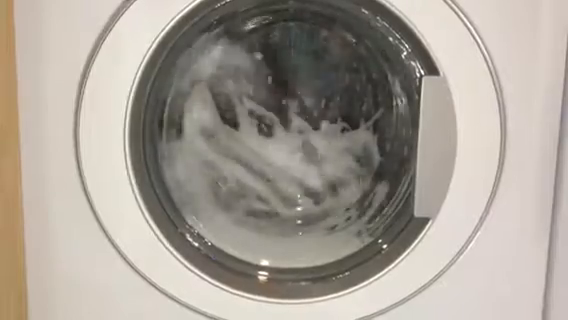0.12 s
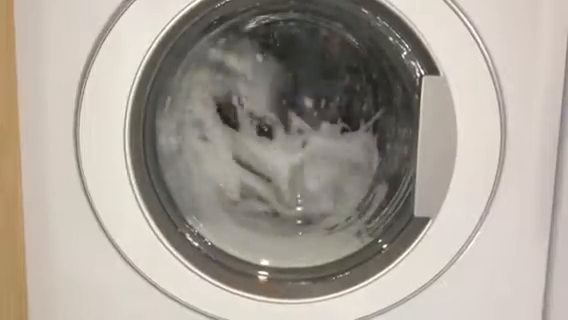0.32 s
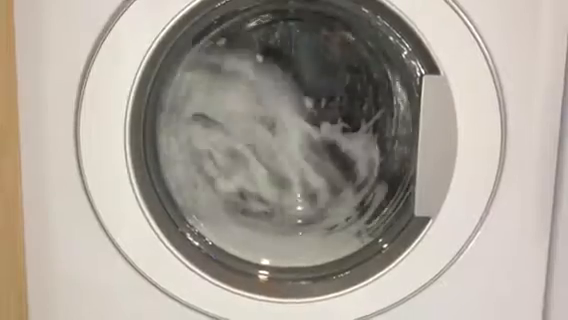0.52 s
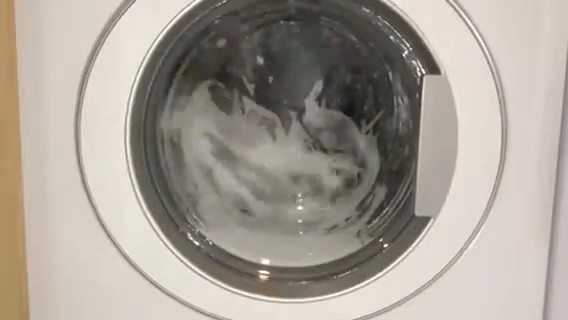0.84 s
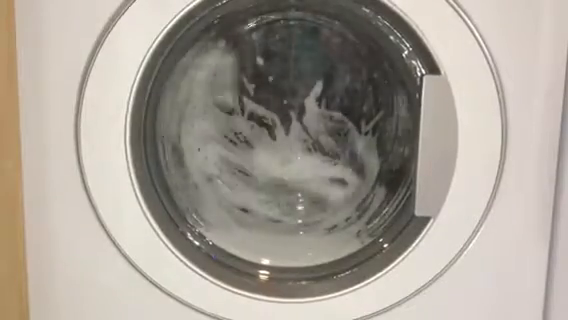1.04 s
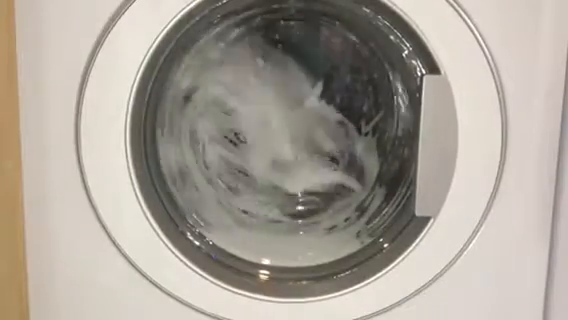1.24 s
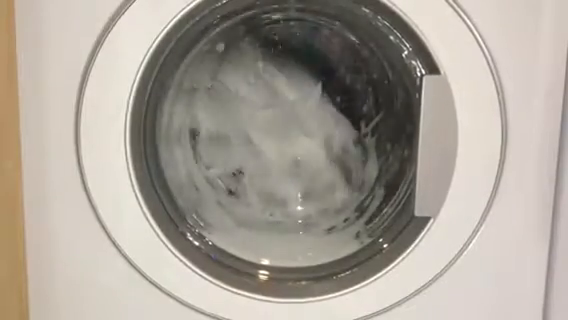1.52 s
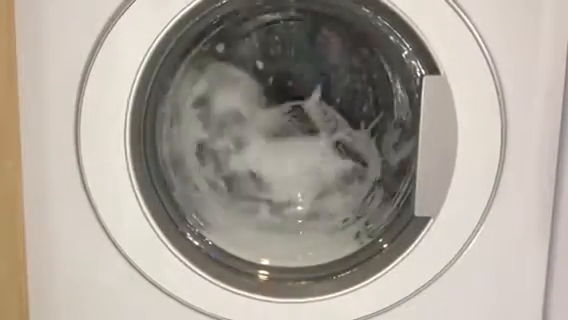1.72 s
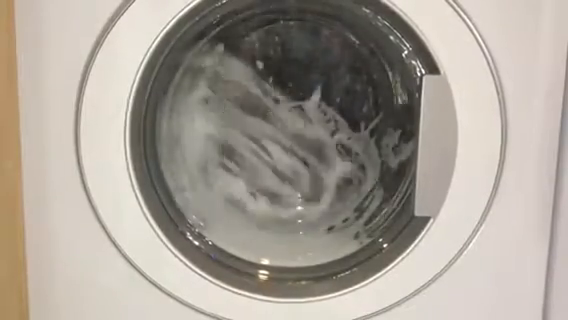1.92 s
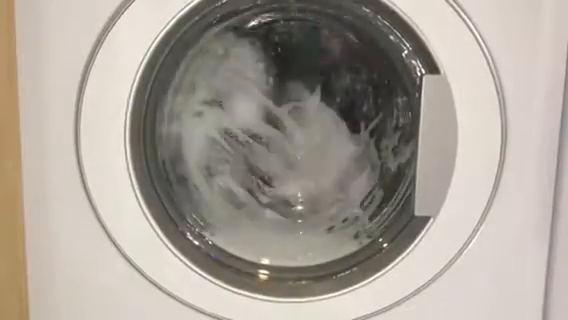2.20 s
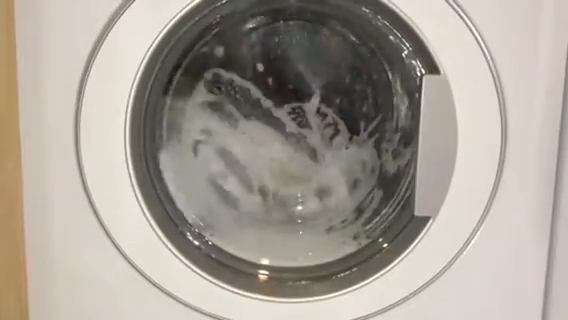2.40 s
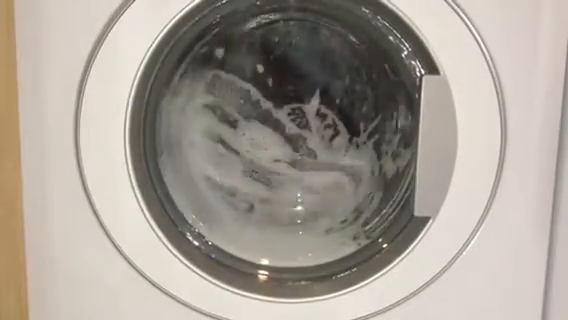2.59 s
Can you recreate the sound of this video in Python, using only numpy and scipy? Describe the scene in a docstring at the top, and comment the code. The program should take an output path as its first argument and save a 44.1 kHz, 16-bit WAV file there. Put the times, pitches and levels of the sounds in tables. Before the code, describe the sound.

Close indoor sound of a washer drum turning soaked laundry: paired clattering knocks with heavy thuds in the first half second, quieter watery churning and dull flops, a crisp rattling knock late, faint steady motor rumble.

```python
"""A small room with a front-loading washing machine turning a heavy wet load, heard at one microphone.
Hard knocks crack, rattle the cabinet as dense noise and ring the drum and door as damped sines.
Wet cloth thuds as low damped sines and slaps the glass once as a noise burst.
Bubble tones and noise slosh, drops ring, and suds spit over the noise rumble and hum of the drive.
Direct sound outweighs the room's tail."""
import sys
import numpy as np
from scipy import signal
from scipy.fft import rfft, irfft, next_fast_len
from scipy.io import wavfile

SR = 44100
rng = np.random.default_rng(int(sys.argv[2]) if len(sys.argv) > 2 else 0)


def dump_mix(stems):
    """Bounce the given channels to the path in sys.argv[1] as a 16-bit WAV at rate SR."""
    frames = np.atleast_2d(stems).T  # one column per channel
    limited = np.clip(frames, -1, 1)  # hard clip at full scale
    pcm = np.round(limited * 32767).astype(np.int16)
    wavfile.write(sys.argv[1], SR, pcm)


N = 121275
T = np.arange(N) / SR

# hard parts of the load on drum and door: start_s, ring_db, pitch_hz (most excited), clatter_db, crack_db
KNOCKS = [(0.195, -47.5, 1390, -59, -80), (0.2341, -29, 1220, -35, -46), (0.2399, -23.5, 890, -34, -57.5),
          (.267, -38, 900, -40.5, -54.5), (0.4445, -29.5, 904, -32, -60), (.4525, -22, 625, -38.5, -60),
          (.511, -38, 786, -44, -63), (2.3524, -36.5, 1500, -35.5, -41.5), (2.3565, -26, 863, -37.5, -52),
          (2.3755, -27.5, 680, -36.5, -55), (2.3873, -26, 556, -52.5, -61), (2.417, -34.5, 600, -48.5, -68)]
# drum and door modes: pitch_hz, level_db, t60_s
DRUM_MODES = [(363, -7, 0.43), (443, -5.5, 0.26), (566, -16, 0.16), (599.8, -9, 0.11), (608.4, -2.5, 0.21),
              (683, -6, 0.52), (786.5, -2.5, 0.087), (824, -3, 0.087), (948, -0.5, 0.13),
              (987, -10.5, 0.16), (1103, -18.5, 0.63), (1293, -9.5, 0.54), (1453, -12.5, 0.6),
              (1580, -19.5, 0.2), (2284, -24.5, 0.17), (2563, -27.5, 0.29)]
# dense ringing of the cabinet: frequency_hz, relative_level_db
CLATTER_SPECTRUM = [(20, -45), (50, -28), (100, -13.5), (170, 4.5), (260, -1), (340, -0.5), (600, 4),
                    (1000, -1.5), (1300, -9.5), (1800, -19.5), (2400, -30), (3000, -39), (6000, -51.5),
                    (15000, -62)]
# first snap of a contact: frequency_hz, relative_level_db
CRACK_SPECTRUM = [(30, -54), (150, -7.5), (700, 8.5), (1500, 6.5), (2400, 6), (3100, -11.5), (5000, -22.5),
                  (7000, -35.5), (15000, -39)]
CONTACT_S = 0.0018  # rise of a hard contact
BLOW_DB, BLOW_DECAY_S = 16, 0.0058  # level and decay of the extra ring at the start of a blow
RING_FOCUS_DB, CLATTER_FOCUS_DB = 9, 2.5  # lift at the most excited pitch
CLATTER_DECAY_S, CLATTER_TAIL_DB = 0.018, -4.5
CRACK_RISE_S, CRACK_DECAY_S, CRACK_TAIL_DB = 0.003, 0.0058, -7
BEAT_DEPTH = 0.38
RING_WET_DB = -11.5


def knocks():
    """Each blow cracks, shakes the cabinet and rings the drum modes near its own pitch."""
    ring, rattle = np.zeros(N), np.zeros(N)
    t = T[:SR // 2]
    mode_hz, mode_db, t60 = np.transpose(DRUM_MODES)
    modes = np.sin(2 * np.pi * mode_hz[:, None] * t) * fade_60db(t, t60[:, None])
    blow = np.minimum(t / CONTACT_S, 1) * (1 + amp(BLOW_DB) * np.exp(-t / BLOW_DECAY_S))
    grid_hz = np.geomspace(20, 16000, 100)
    for start, ring_db, pitch_hz, clatter_db, crack_db in KNOCKS:
        share = amp(mode_db + RING_FOCUS_DB * focus(mode_hz, pitch_hz))
        share = share / share.sum()
        # close pairs of modes beat as they ring, each at its own random rate
        beat_hz = rng.uniform(-13.2, 12, (len(mode_hz), 1))
        beats = 1 + BEAT_DEPTH * np.sin(2 * np.pi * beat_hz * t)
        add(ring, start, amp(ring_db) * blow * (share @ (modes * beats)))

        panel_db = read(CLATTER_SPECTRUM, grid_hz) + CLATTER_FOCUS_DB * focus(grid_hz, pitch_hz)
        panels = colour(taps(SR), np.column_stack([grid_hz, panel_db]))
        clatter = burst(panels, CONTACT_S, CLATTER_DECAY_S, CLATTER_TAIL_DB)
        add(rattle, start, amp(clatter_db) * clatter)

        snap = colour(taps(SR), CRACK_SPECTRUM)
        crack = burst(snap, CRACK_RISE_S, CRACK_DECAY_S, CRACK_TAIL_DB)
        add(rattle, start, amp(crack_db) * crack)
    return room(ring, RING_WET_DB) + rattle


def focus(hz, pitch_hz):
    """How near a frequency lies to the pitch that a blow excites most, 0-1."""
    width_octaves = 0.44
    return np.exp(-(np.log2(hz / pitch_hz) / width_octaves) ** 2)


# dull thuds of wet cloth: start_s, level_db, pitch_hz, t60_s
THUDS = [(.236, -31.5, 200.6, 0.21), (.262, -31.5, 166.3, 0.12), (.305, -43, 292.6, 0.24),
         (.444, -26.5, 209.3, 0.091), (.449, -20.5, 261, 0.094), (.468, -33, 355, 0.16),
         (.972, -49, 222, 0.1), (1.064, -45, 274, 0.19), (1.115, -51.5, 171, 0.28),
         (1.4555, -37, 266, 0.083), (1.459, -34, 164.5, 0.15), (1.682, -48.5, 200.5, 0.35),
         (1.72, -40, 251.4, 0.18), (2.06, -34.5, 165.3, 0.14), (2.066, -40, 245, 0.19),
         (2.092, -44, 133.7, 0.18), (2.104, -41, 299.6, 0.11), (2.364, -34, 278.2, 0.25),
         (2.728, -43.5, 227, 0.23)]
THUD_RISE_S, THUD_WET_DB = 0.003, -11


def thuds():
    """Wet cloth lands dully: each thud is a low damped resonance in the room."""
    return room(pings(THUDS, THUD_RISE_S), THUD_WET_DB)


# wet cloth on the door glass: frequency_hz, relative_level_db
SLAP_SPECTRUM = [(30, -40), (150, -16), (500, 5.5), (950, 0.5), (1200, -2.5), (1500, -1.5), (2500, -14.5),
                 (3200, -20), (5500, -31), (6300, -44), (15000, -54)]
SLAP_START_S, SLAP_DB = 2.0565, -39.5
SLAP_RISE_S, SLAP_DECAY_S, SLAP_TAIL_DB = 0.0012, 0.0054, -7.5


def slap():
    """A wet fold smacks flat against the door glass, a short burst of dense noise."""
    out = np.zeros(N)
    smack = burst(colour(taps(SR), SLAP_SPECTRUM), SLAP_RISE_S, SLAP_DECAY_S, SLAP_TAIL_DB)
    add(out, SLAP_START_S, amp(SLAP_DB) * smack)
    return out


# falls of water: start_s, churn_db, rise_s, decay_s, splash_db
SLOSHES = [(0.023, -55, 0.0084, 0.029, -76), (0.108, -55, 0.0062, 0.11, -81.5),
           (0.221, -38, 0.019, .02, -51), (.328, -47, .004, 0.015, -62.5), (.41, -51, 0.021, 0.072, -61),
           (0.612, -48.5, .005, 0.049, -74), (0.801, -55.5, 0.0053, 0.08, -72),
           (0.917, -78, 0.0045, 0.024, -77), (.952, -50, 0.023, 0.065, -71),
           (1.053, -56, 0.0088, 0.023, -68), (1.187, -78, 0.0063, 0.043, -78),
           (1.321, -66, 0.0089, 0.034, -72), (1.445, -57.5, 0.0061, 0.024, -89),
           (1.518, -50.5, .012, 0.025, -73), (1.626, -84, .008, 0.015, -67), (1.669, -55, 0.0047, 0.1, -72),
           (1.706, -51.5, 0.01, 0.055, -82), (2.008, -61, 0.0035, 0.021, -75),
           (2.192, -53.5, 0.02, 0.077, -79), (2.64, -56.5, .005, 0.09, -80.5),
           (2.722, -52, 0.007, 0.064, -93)]
# churning water: frequency_hz, relative_level_db
CHURN_SPECTRUM = [(25, -26), (70, -12), (105, 4.5), (170, 6), (250, 5.5), (340, -4.5), (600, -2.5),
                  (900, -10.5), (1400, -21.5), (2200, -41.5), (3200, -62), (15000, -60.5)]
# its splashing: frequency_hz, relative_level_db
SPLASH_SPECTRUM = [(300, -9.5), (1000, 4.5), (2100, 8.5), (2800, -3.5), (3300, -8.5), (5000, -12.5),
                   (7500, -25), (15000, -21)]
WATER_WET_DB = -5


def sloshes():
    """Water churns and splashes each time a fold of the load falls, as swells of bubbling noise."""
    churn, splash = np.zeros(N), np.zeros(N)
    for start, churn_db, rise, decay, splash_db in SLOSHES:
        envelope = swell(start, rise, decay)
        churn += amp(churn_db) * envelope
        splash += amp(splash_db) * envelope
    return churn * colour(bubbles(), CHURN_SPECTRUM) + splash * colour(bubbles(), SPLASH_SPECTRUM)


BUBBLES_PER_S, BUBBLE_SPREAD_DB = 1500, 6  # mean rate over all pitches, range of random gain
BUBBLE_SHARE = 0.55  # share of the power in bubbles, the rest is spray
BUBBLE_CYCLES = 6.1  # cycles in one unit of a bubble's envelope time


def bubbles(count=40):
    """A froth of short rising bubble tones in fine spray."""
    froth = np.zeros(N)
    for hz in np.geomspace(200, 6000, count):
        u = np.arange(0, 5, hz / BUBBLE_CYCLES / SR)  # envelope time, shorter for higher bubbles
        tone = u * np.exp(-2 * u) * np.sin(2 * np.pi * BUBBLE_CYCLES * u * (1 + 0.02 * u))
        struck = rng.random(N) < BUBBLES_PER_S / count / SR
        pops = struck * amp(BUBBLE_SPREAD_DB * rng.random(N))
        froth += np.sqrt(hz) * unit(signal.oaconvolve(pops, tone)[:N])
    spray = rng.standard_normal(N)
    return np.sqrt(BUBBLE_SHARE) * unit(room(froth, WATER_WET_DB)) + np.sqrt(1 - BUBBLE_SHARE) * spray


# single drops: start_s, level_db, pitch_hz, t60_s
DROPS = [(1.062, -68.5, 2100, 0.054), (1.2, -71.5, 1500, .05), (1.371, -61.5, 1514, 0.087)]


def drops():
    """Each single drop is a high damped resonance in the room."""
    return room(pings(DROPS, CONTACT_S), WATER_WET_DB)


# spitting suds: start_s, level_db, rise_s, decay_s
SPITS = [(0.023, -72, .004, 0.022), (.532, -69, .004, 0.017), (0.555, -71.5, .006, 0.024),
         (0.804, -74.5, 0.0018, 0.018), (.834, -77, 0.0033, 0.026), (1.18, -75.5, 0.014, 0.036),
         (1.671, -72, 0.0014, 0.0045), (1.907, -65, .012, 0.035), (2.045, -70.5, .003, 0.025),
         (2.19, -71.5, 0.0044, 0.011), (2.326, -69.5, 0.0044, 0.024), (2.49, -72.5, 0.0039, .012)]
# their fizz: frequency_hz, relative_level_db
SPIT_SPECTRUM = [(800, -5), (2400, 10), (3600, -4.5), (9500, -9), (13500, -5.5), (16000, -1)]


def spits():
    """Brief fizzes of suds, swells of bright noise."""
    envelope = sum(amp(db) * swell(start, rise, decay) for start, db, rise, decay in SPITS)
    return envelope * colour(rng.standard_normal(N), SPIT_SPECTRUM)


# thin run of water: frequency_hz, relative_level_db
TRICKLE_SPECTRUM = [(2000, -12), (4200, -1), (5000, 8), (5900, -5), (9000, -34)]
TRICKLE_CENTRE_S, TRICKLE_HALF_S, TRICKLE_DB = 1.3, 0.054, -87


def trickle():
    """A thin, high run of water, noise that swells and fades once."""
    envelope = np.exp(-((T - TRICKLE_CENTRE_S) / TRICKLE_HALF_S) ** 2)
    return amp(TRICKLE_DB) * envelope * colour(rng.standard_normal(N), TRICKLE_SPECTRUM)


# drive and tub: frequency_hz, relative_level_db
RUMBLE_SPECTRUM = [(20, -43.5), (40, -14), (72, -15.5), (105, 0.5), (170, 0), (250, 1.5), (330, -8.5),
                   (600, -8.5), (900, -16.5), (1400, -28), (2200, -33.5), (3100, -42), (6500, -47),
                   (9100, -46.5), (10500, -48), (13000, -49.5), (16000, -52)]
# drive tone: pitch_hz, level_db
HUM = [(249, -68)]
# the tub booms as the load shifts: centre_s, level_db, half_length_s
BOOMS = [(.31, -57.5, 0.075), (.53, -64.5, 0.099), (0.667, -60, 0.081), (1.021, -58, 0.13),
         (1.516, -60, 0.04), (1.72, -61, 0.11), (2.108, -56, 0.026), (2.441, -62, 0.15)]
RUMBLE_DB, RUMBLE_WANDER_DB = -58, 2.55
HUM_WANDER_HZ, BOOM_HZ, BOOM_WANDER_HZ = 11, 73.4, 7  # wanders are rms


def drive():
    """Restless rumble of the turning tub, its low booms and the motor's faint hum."""
    noise = colour(rng.standard_normal(N), RUMBLE_SPECTRUM)
    low = signal.sosfilt(signal.butter(2, 2500, "low", fs=SR, output="sos"), noise)
    noise = colour(rng.standard_normal(N), RUMBLE_SPECTRUM)
    high = signal.sosfilt(signal.butter(2, 2500, "high", fs=SR, output="sos"), noise)
    # only the low part wavers in level
    rumble = amp(RUMBLE_DB) * (low * amp(RUMBLE_WANDER_DB * wander(19)) + high)

    hum = np.zeros(N)
    for hz, db in HUM:
        tone = np.sin(2 * np.pi * np.cumsum(hz + HUM_WANDER_HZ * wander(11.6)) / SR)
        hum += amp(db) * unit(tone * (1 + 0.5 * wander(3.3)))

    boom = unit(np.sin(2 * np.pi * np.cumsum(BOOM_HZ + BOOM_WANDER_HZ * wander(23)) / SR))
    boom_level = sum(amp(db) * np.exp(-((T - centre) / half) ** 2) for centre, db, half in BOOMS)
    return rumble + hum + boom * boom_level


# fading of the small room: frequency_hz, t60_s
ROOM_FADE = [(80, 0.32), (250, 0.52), (700, 0.49), (1800, 0.52), (5000, 0.33), (14000, 0.26)]


def die_away(x):
    """Lets each band fade at the room's rate."""
    hz, t, bands = signal.stft(x, SR, nperseg=256)
    fade = amp(-60 * t / read(ROOM_FADE, hz)[:, None])
    return signal.istft(bands * fade, SR, nperseg=256)[1][:len(x)]


def room(x, wet_db):
    """Adds the small room's tail of dense reflections to the direct sound."""
    tail = die_away(taps(SR)) * np.minimum(T[:SR] / 0.017, 1)  # builds up over 17 ms
    tail = tail / np.linalg.norm(tail)
    return x + amp(wet_db) * signal.fftconvolve(x, tail)[:N]


def taps(count):
    """Dense reflections of random sign."""
    return rng.choice([-1., 1.], count) * (rng.random(count) < .5)


def burst(dense, rise, decay, tail_db):
    """Countless close panel modes: a quick flare, then the room's tail."""
    t = T[:SR]
    flare = dense * np.exp(-t / decay)
    return np.minimum(t / rise, 1) * (flare + amp(tail_db) * die_away(dense))


def pings(rows, rise):
    """One damped resonance for each row."""
    out = np.zeros(N)
    t = T[:SR // 2]
    for start, db, hz, t60 in rows:
        envelope = np.minimum(t / rise, 1) * fade_60db(t, t60)
        add(out, start, amp(db) * envelope * np.sin(2 * np.pi * hz * t))
    return out


def fade_60db(t, t60):
    """Exponential decay that falls by 60 dB in t60 seconds."""
    return np.exp(-np.log(1000) * t / t60)


def swell(start, rise, decay):
    """Envelope that rises from its start and falls away."""
    return np.clip((T - start) / rise, 0, 1) * np.exp(-np.maximum(T - start - rise, 0) / decay)


def wander(hz):
    """Slow random drift, mostly below a rate, rms 1."""
    spectrum = rfft(rng.standard_normal(2 * N))
    lowpass = np.exp(-(np.fft.rfftfreq(2 * N, 1 / SR) / hz) ** 2)
    return unit(irfft(spectrum * lowpass)[:N])


def colour(x, spectrum):
    """Gives a steady signal a spectrum, at rms 1."""
    size = next_fast_len(len(x))
    gain = amp(read(spectrum, np.fft.rfftfreq(size, 1 / SR)))
    return unit(irfft(rfft(x, size) * gain, size)[:len(x)])


def read(points, hz):
    """Reads a table on a log-frequency axis."""
    f, value = np.transpose(points)
    return np.interp(np.log(hz + 1), np.log(f + 1), value)


def add(mix, start, sound):
    """Mixes a sound in at its start in seconds."""
    part = mix[max(round(start * SR), 0):][:len(sound)]
    part += sound[:len(part)]


def unit(x):
    """Scales to rms 1."""
    return x / np.sqrt(np.mean(x ** 2) + 1e-20)


def amp(db):
    """Decibels to gain."""
    return 10 ** (np.asarray(db) / 20)


def scene():
    """All sounds of the machine at one microphone."""
    load = knocks() + thuds() + slap()
    water = sloshes() + drops() + spits() + trickle()
    return (load + water + drive())[None]


def record(dry):
    """The recorder's band limit, a steep low-pass at 14.9 kHz."""
    lowpass = signal.firwin(511, 14900, window=("kaiser", 9), fs=SR)
    return signal.oaconvolve(dry, lowpass[None], "same")


dry = scene()
out = record(dry)
dump_mix(out)
```